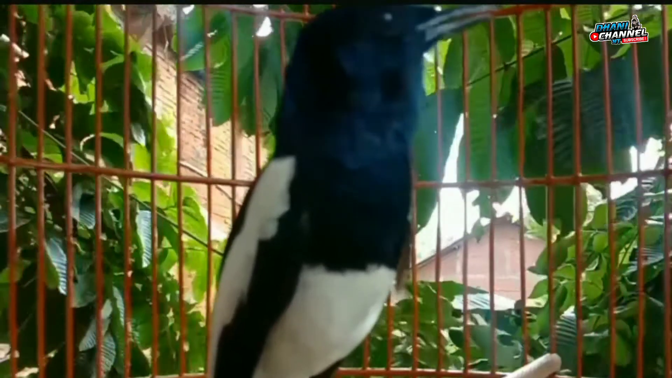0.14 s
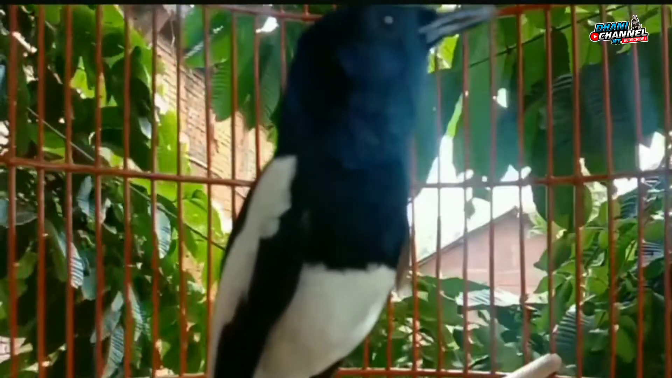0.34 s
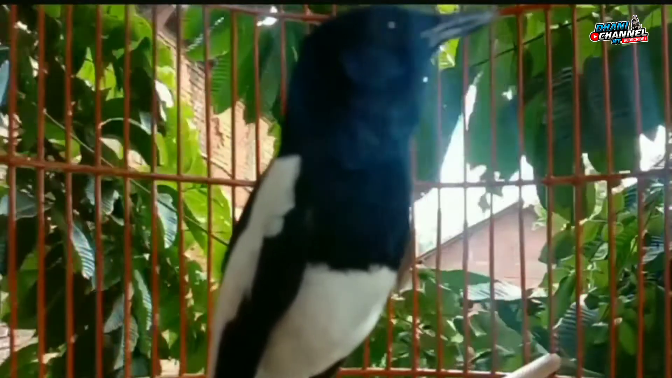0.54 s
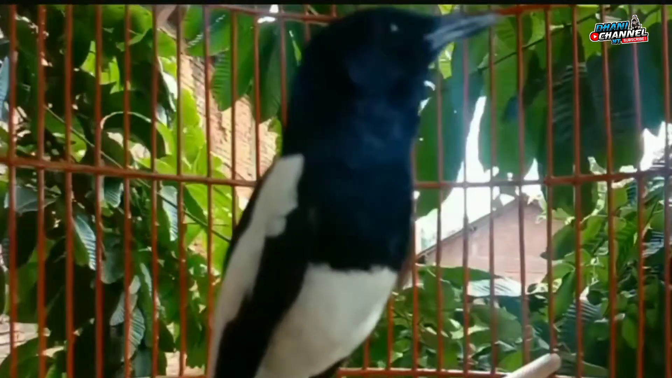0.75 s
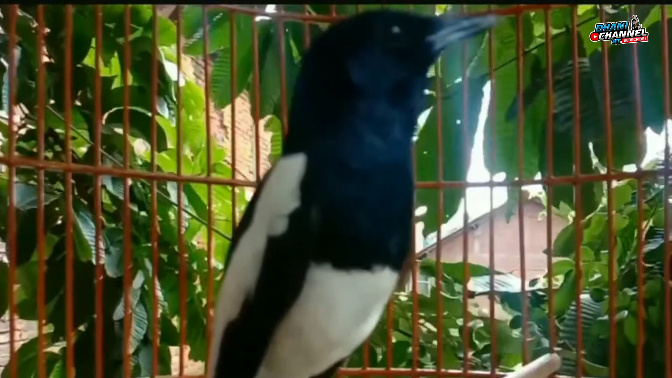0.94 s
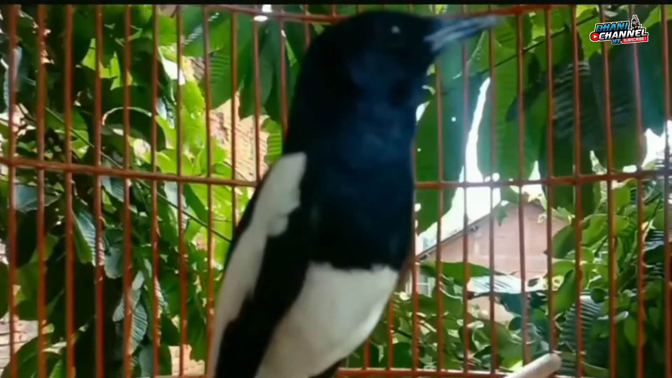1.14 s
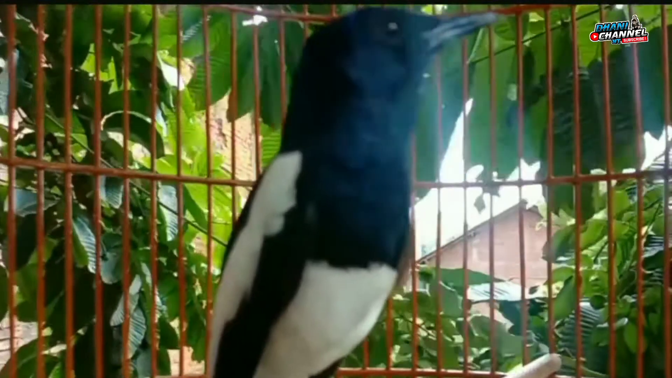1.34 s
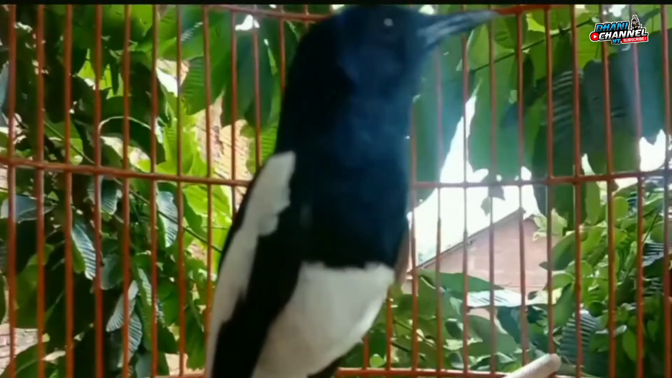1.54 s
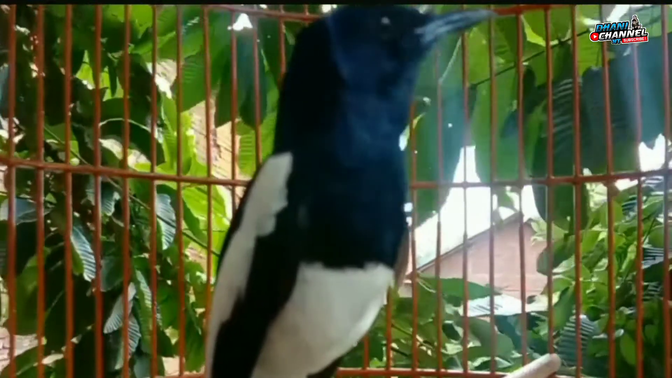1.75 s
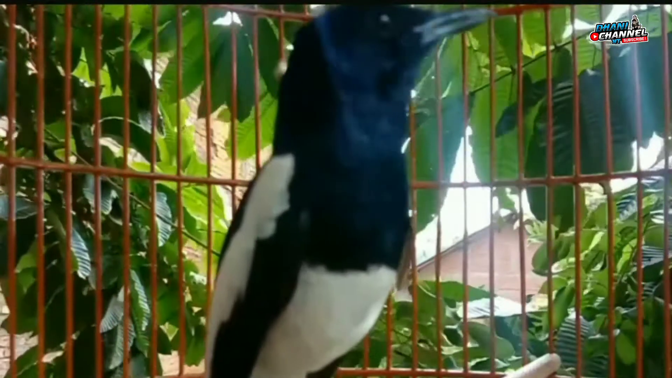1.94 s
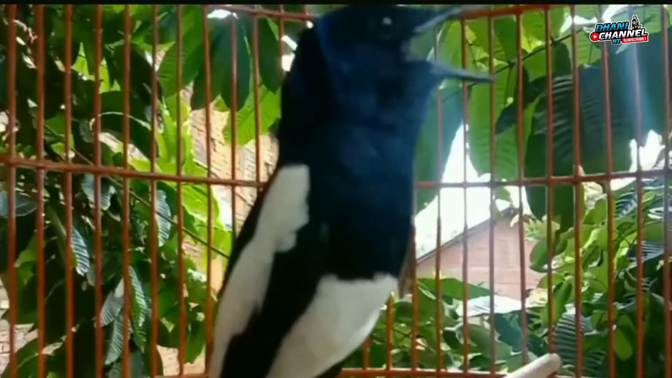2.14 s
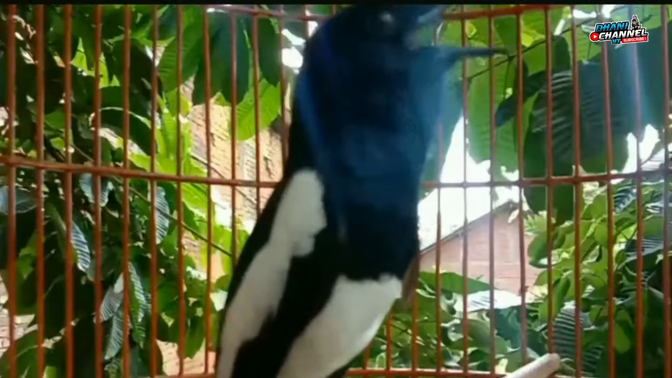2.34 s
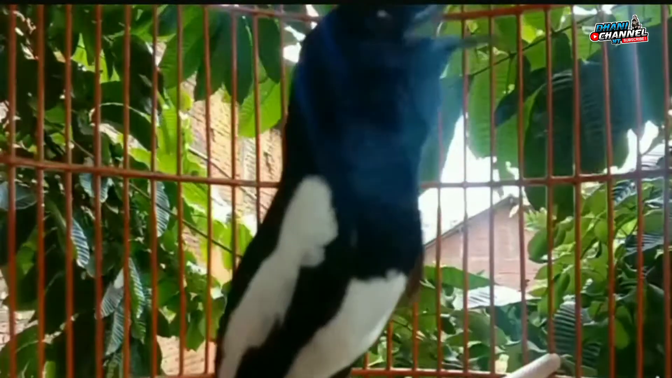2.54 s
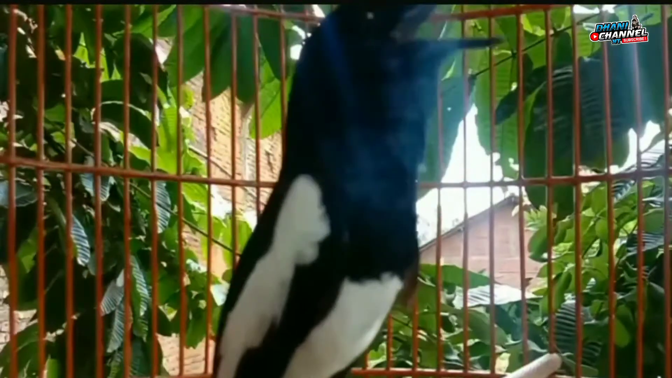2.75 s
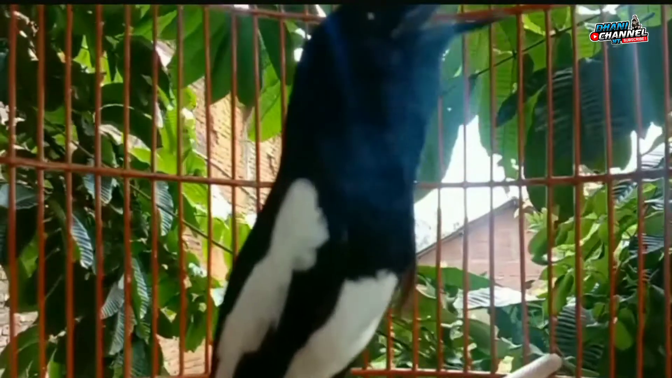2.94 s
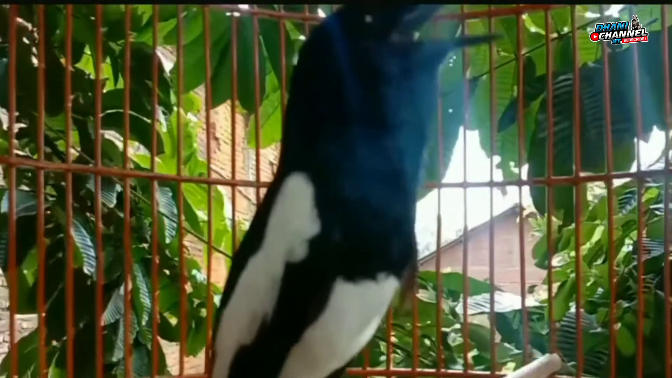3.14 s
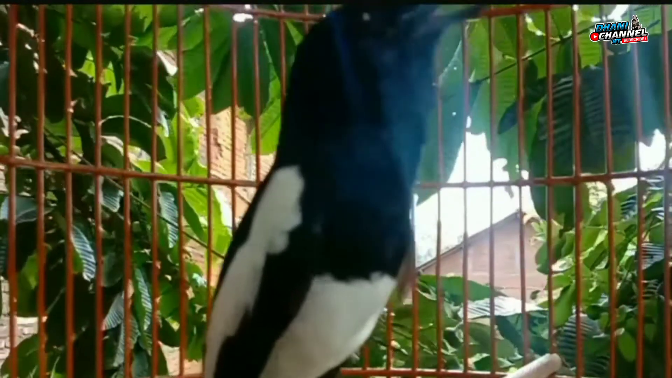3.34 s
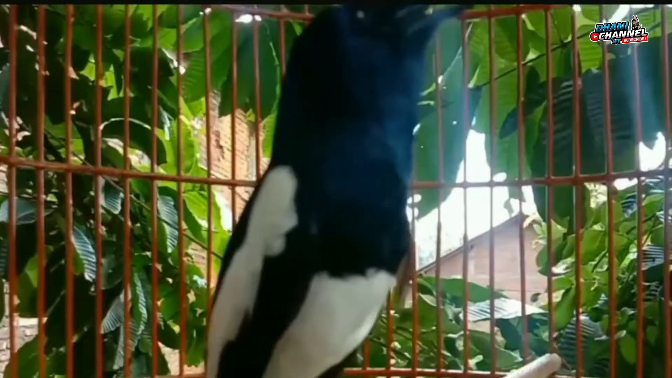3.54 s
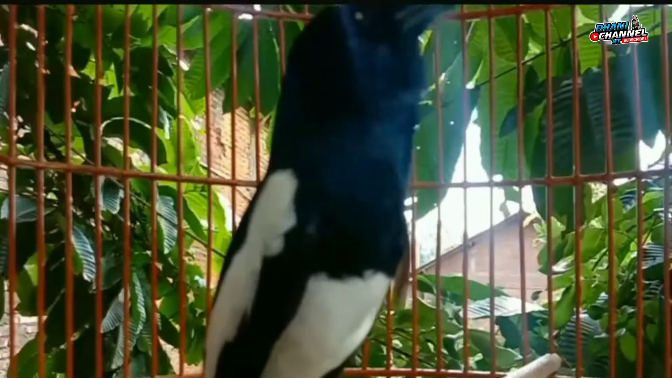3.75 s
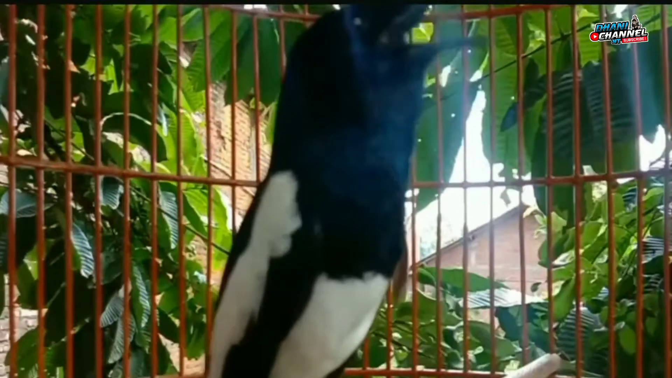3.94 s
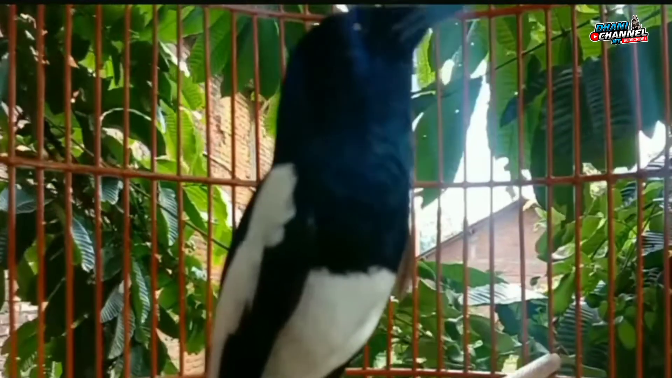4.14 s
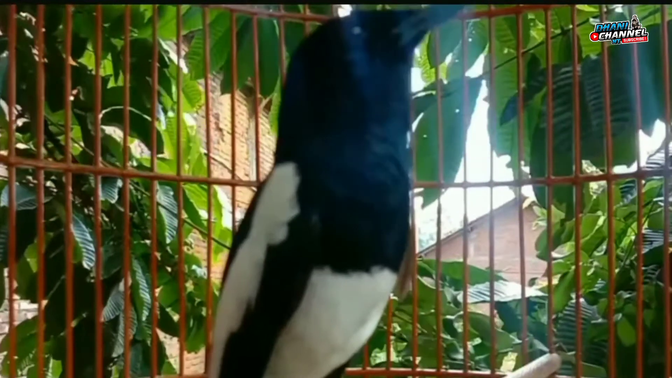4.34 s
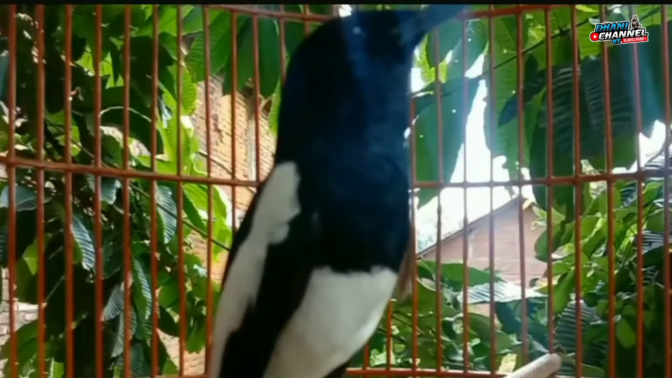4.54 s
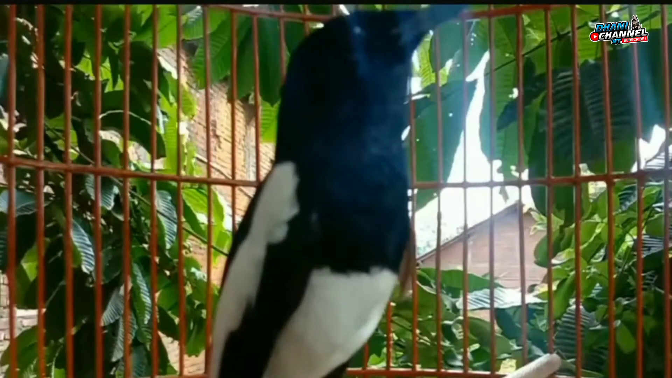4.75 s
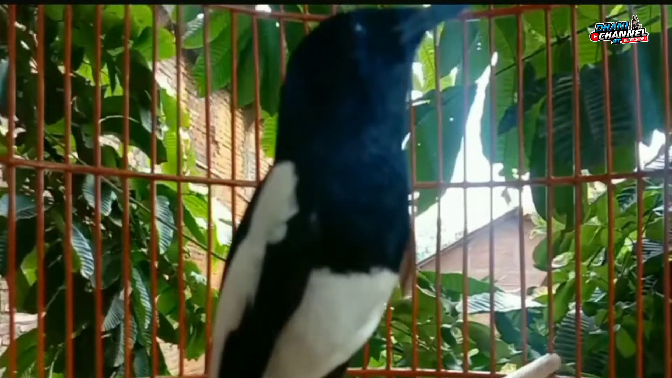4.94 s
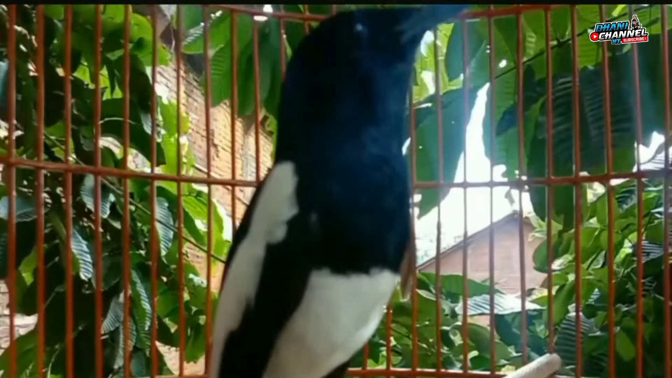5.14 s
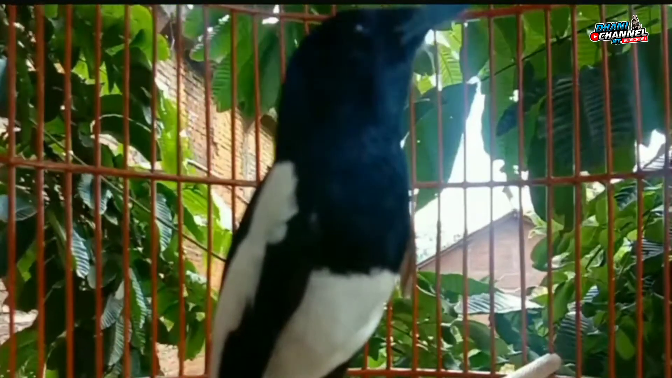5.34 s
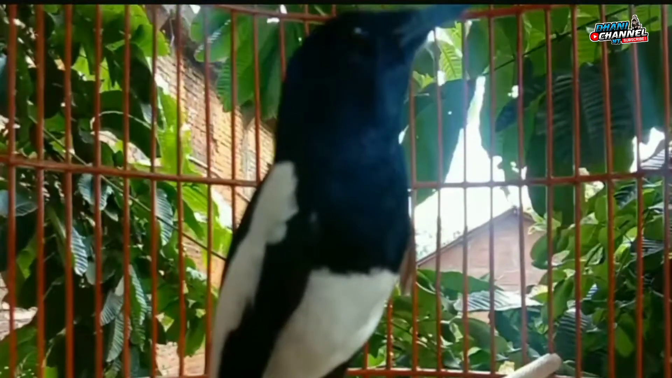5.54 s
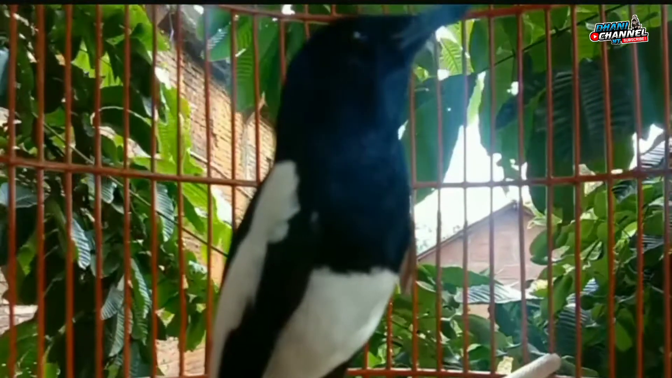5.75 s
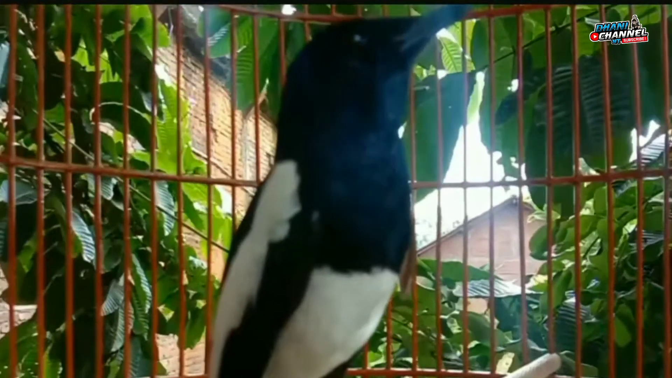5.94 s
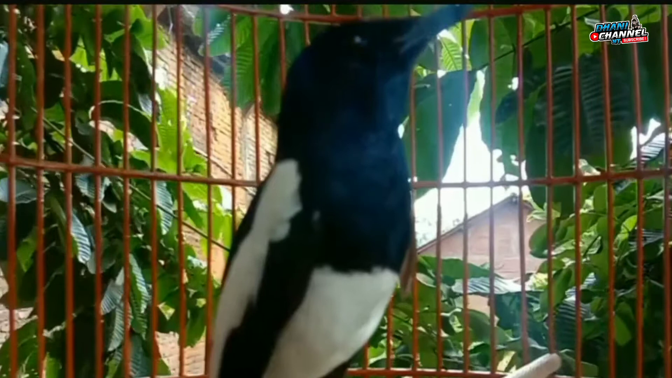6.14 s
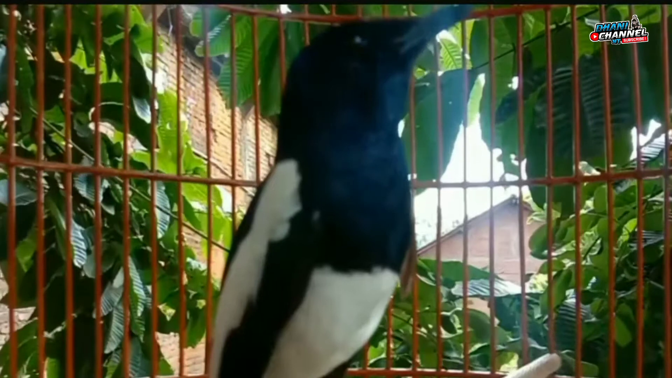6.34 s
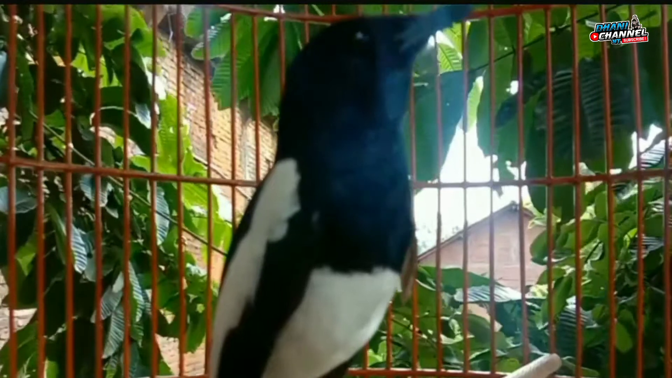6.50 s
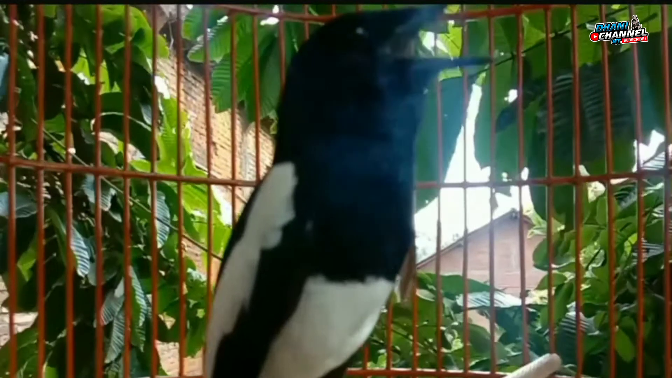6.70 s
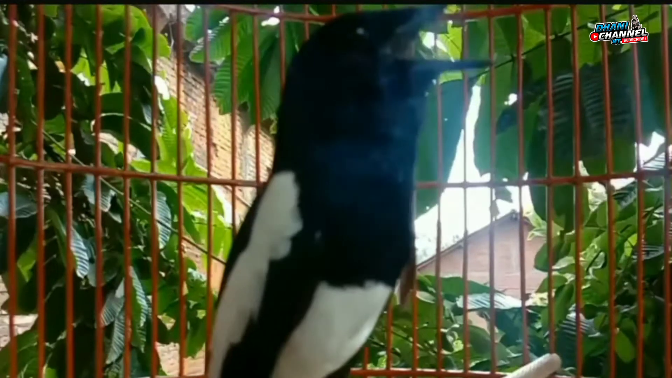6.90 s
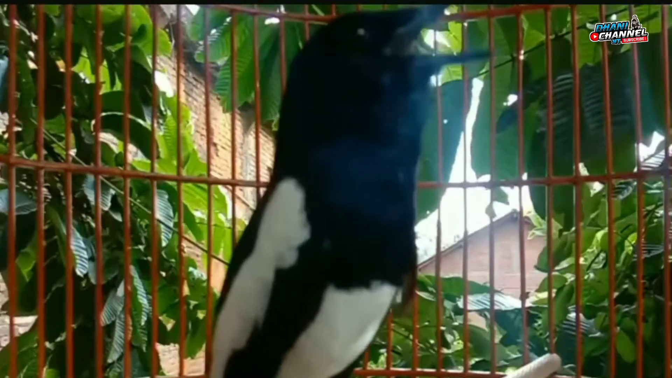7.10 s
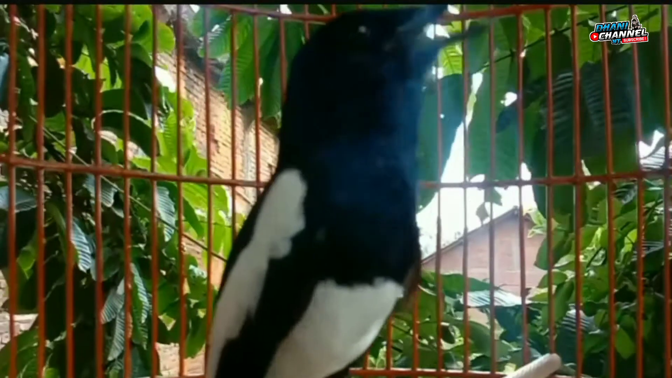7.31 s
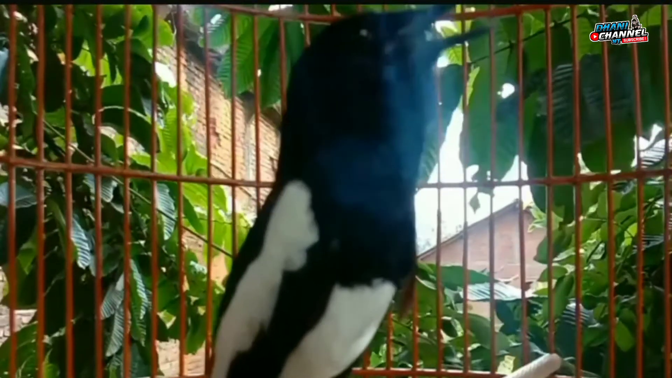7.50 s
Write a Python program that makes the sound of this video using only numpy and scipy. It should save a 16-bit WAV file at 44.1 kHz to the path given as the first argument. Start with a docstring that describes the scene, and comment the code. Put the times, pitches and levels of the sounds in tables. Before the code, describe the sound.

From 0 to 2 seconds a quiet garden is raised by phone gain: muffled traffic, airy street noise, a wavering low hum, thin descending far whistles, and a wheezy, raspy call around 0.9 to 1.3. At 2.0 a caged songbird close by bursts in with a clear high whistle lasting a third of a second, then separate short hooked, falling and level notes until 3.9, several breaking into a fast buzzing trill; the last swoops down, rattles and leaps up. A faint wheeze slips between notes at 2.3. From 4.4 to 5.7 a small bird across the garden sings thin hooked notes, followed by a neighbour's wheezes and rasp to about 6.1. Traffic and hum swell. At 6.65 the near bird returns with a held whistle, a hooked note at 7.0 and a trilled fall into a short rise at 7.25 to 7.55. A last faint wheeze and rasp end it. Short wall echo fills the gaps.

```python
"""A walled garden on a phone microphone: traffic, street and a wavering hum lie under thin far whistles,
wheezes and rasps. At two seconds a caged songbird close by whistles a loud phrase, some notes breaking into
a fast trill. Then a small bird across the garden sings hooked notes and a neighbour wheezes and rasps.
The near bird sings again, and a last wheeze and rasp follow.
The phone lifts its gain in every pause, so garden and echo swell between the notes."""
import sys
import numpy as np
from scipy import signal
from scipy.fft import rfft, irfft, next_fast_len
from scipy.io import wavfile
from scipy.ndimage import uniform_filter1d, minimum_filter1d, map_coordinates

SR = 44100
rng = np.random.default_rng(int(sys.argv[2]) if len(sys.argv) > 2 else 0)


def log_audio(samples):
    """Write samples as a 16-bit WAV file to the path given in sys.argv[1]."""
    # one column per channel
    frames = np.atleast_2d(samples).T
    # limit to full scale, then quantise
    limited = np.clip(frames, -1, 1)
    pcm = np.round(limited * 32767).astype(np.int16)
    wavfile.write(sys.argv[1], SR, pcm)


N = 338247

# Levels in the tables are relative: distance, partials and the phone's gain change them later.
# Overtones of the near bird. Each row: multiple of the pitch, level in dB before the throat.
OVERTONES = [(2, -32.5), (3, -45.5), (4, -37.5), (5, -41.5), (6, -41), (7, -42)]
# Throat that colours those overtones. Each row: frequency in Hz, gain in dB.
THROAT = [(3600, 11), (5000, -5.5), (7300, 1), (8400, -5.5), (9700, 8.5), (11200, -0.5), (12700, -19),
          (15000, -4)]
# Hoarse air of the near bird. Each row: frequency in Hz, relative density in dB per Hz.
BREATH = [(1200, -18), (2000, -1.5), (4000, 2.5), (6000, -9), (7800, -16.5), (9600, -1), (12500, -21),
          (15500, -19.5)]

# Syllables of the near bird, tuned later. Each row: share of the length, pitch in Hz, level in dB.
CREST = [(0, 2417, -23), (.032, 2630, -11.5), (.16, 3150, -0.5), (.23, 3196, 1), (.35, 3217, 0.5),
         (.68, 3108, 2.5), (.87, 3034, -1), (.95, 2914, -1.5), (1, 2816, -14)]
HELD = [(0, 2500, -27.5), (.036, 2800, -18), (.1, 2903, -2), (.14, 3010, -5), (.33, 3123, -1.5),
        (.89, 3090, 3), (.95, 3054, -6), (1, 3000, -7.5)]
HOOK = [(0, 2607, -25), (.1, 2700, -12), (.25, 2824, -0.5), (.44, 2877, 1), (.6, 2744, 3),
        (.85, 2320, -5.5), (.91, 2130, -11.5), (1, 1470, -21.5)]
FALL = [(0, 3693, -35.5), (.08, 3760, -8.5), (.18, 3720, 0), (.37, 3565, 2), (.55, 3082, 0.5),
        (.72, 2900, -1), (.9, 2748, -1), (1, 2530, -6)]
RISE = [(0, 2200, 2), (.06, 2404, -6), (.25, 2424, -2), (.75, 2571, 2), (.93, 2585, -6.5), (1, 2613, -28.5)]
FLAT = [(0, 2400, -36), (.063, 2463, -13.5), (.155, 2469, 1), (.34, 2459, -0.1), (.9, 2541, 1),
        (.96, 2569, -8.5), (1, 2480, -1)]
SWOOP = [(0, 2535, -12.5), (.084, 2465, 4), (.19, 2292, -1), (.39, 1913, -2), (.5, 1864, -0.5),
         (.62, 1920, -1.5), (.73, 2415, -0.2), (.78, 2744, 0.5), (.84, 3091, 0.8), (.94, 3005, -0.5),
         (.965, 2895, -10.5), (1, 2206, -13)]
# Trill or hoarse break of a syllable. Each row: share of the length, beats per second,
# swing in Hz before the note's trill depth, breath under the tone in dB.
HOOK_BREAK = [(.5, 120, 2, -59), (.83, 120, 97, -26), (1, 90, 64, -11)]
FALL_TRILL = [(.28, 97, 4.3, -60), (.43, 97.6, 85, -55.5), (.9, 89.3, 42, -45.5), (1, 70.87, 42, -21.5)]
SWOOP_TRILL = [(.02, 68.2, 2, -42), (.25, 65.6, 8, -27.5), (.34, 66.2, 70, -22.5), (.62, 68, 66, -25),
               (.7, 83, 261, -21), (.83, 95.8, 263, -40.5), (1.002, 122.3, 270, -30)]
# The near song. Each row: syllable, its trill, start in seconds, length in seconds, highest pitch in Hz
# before the sag, sag over the note in Hz, level in dB, swell over the note in dB, overtones in dB,
# trill depth as a factor.
SUNG = [(CREST, [], 2.0, .314, 3208, 0, -26.5, 0, -1.02, 0),
        (HOOK, HOOK_BREAK, 2.392, 0.13, 2845, 10, -27, .3, 2.1, 1),
        (FALL, FALL_TRILL, 2.586, .175, 3782, 52, -25.5, .3, 4.6, .6), (RISE, [],
        2.757, .149, 2590, 5, -27, -0.32, -2.5, 0),
        (HOOK, HOOK_BREAK, 3.022, 0.11, 2835, 110, -27.5, .3, .4, 1), (FLAT, [],
        3.26, 0.2044, 2576, 0, -27, 0, -1, 0), (SWOOP, SWOOP_TRILL, 3.552, .381, 3082, 0, -30, 0, 2, 1),
        (HELD, [], 6.645, .274, 3127, 0, -25.5, 0, -3.5, 0),
        (HOOK, HOOK_BREAK, 7.0, 0.13, 2845, 5.6, -26.5, -.3, 3.3, 1.05),
        (FALL, FALL_TRILL, 7.236, .166, 3743, -90.5, -26.5, -.3, 7.1, 1.7), (RISE, [],
        7.397, .151, 2600, 12, -27.5, .3, -3, 0)]

# Hooked notes of a small bird. Each row: share of the length, nominal pitch in Hz, level in dB.
DROP = [(0, 3260, 5), (.4, 3100, -8), (1, 2420, 6)]
DIP = [(0, 2950, -7), (.15, 2994, 1), (.52, 2890, -2), (.8, 3000, -3), (1, 3400, -2)]
JUMP = [(0, 2493, 2), (.17, 2500, -1), (.28, 2950, 1), (1, 2710, -2.5)]
# Its song. Each row: shape, start in seconds, length in seconds, sag over the note in Hz, level in dB.
HOOKS = [(DROP, 4.365, 0.057, -100, -59), (DIP, 4.445, .235, 5.6, -62.5), (JUMP, 4.765, 0.11, 5, -59),
         (DROP, 4.972, 0.045, 120, -59), (DIP, 5.055, .2, 4.2, -59.5), (JUMP, 5.39, 0.121, 5, -61),
         (DROP, 5.625, 0.019, 60, -62), (JUMP, 5.64, 0.099, 290, -58.5)]
# Far whistles and chirps. Each row: start in seconds, length in seconds, first pitch in Hz,
# last pitch in Hz, peak in dB, place of the peak as a share of the length.
WHISTLES = [(.06, 0.102, 4020, 3670, -55.5, 0.43), (.145, 0.13, 3047, 2754, -47, 0.12),
            (.2, .06, 2590, 2480, -50, .4), (.51, 0.2, 2930, 2750, -43.5, 0.43),
            (.67, 0.15, 3454, 3260, -58.5, 0.12), (.6, 0.14, 1093, 1050, -57.5, 0.55),
            (1.15, 0.088, 718, 539, -54.5, 0.33), (1.27, .08, 850, 790, -56.5, .15),
            (1.55, 0.066, 1997, 2030, -58.5, 0.18), (1.65, .095, 2150, 3400, -65, .7),
            (1.74, 0.057, 3520, 3540, -61.5, 0.28), (1.72, .15, 2970, 3100, -62, .15),
            (1.9, .1, 2915, 2980, -57, 0.73), (3.14, .12, 1040, 895, -55.5, 0.23),
            (4.02, 0.22, 2793, 2826, -60, 0.48), (4.41, 0.046, 2530, 2500, -60, .25),
            (4.95, 0.27, 1130, 1180, -59, 0.77), (5.2, 0.33, 4000, 3456, -60, .4),
            (5.23, .08, 7050, 5990, -58.5, 0.4), (5.42, 0.11, 7590, 6640, -55.5, .55),
            (7.25, 0.084, 2723, 2420, -34.5, .15)]
# A neighbour's wheezy notes. Each row: start in seconds, length in seconds, strongest partial at first
# in Hz, at last in Hz, peak in dB, place of the peak as a share of the length.
WHEEZES = [(.9, 0.086, 4470, 4366, -50.5, 0.78), (.92, 0.073, 4110, 3250, -51.5, 0.71),
           (.98, .1, 3300, 2800, -50, 0.34), (1.08, 0.084, 4050, 3880, -57.5, 0.8),
           (1.08, 0.085, 2764, 2737, -60, .45), (1.13, 0.068, 4650, 5000, -55, .25),
           (2.3, .1, 4520, 4070, -52, 0.76), (5.71, .1, 4510, 4697, -50, 0.84),
           (5.79, 0.056, 6450, 6480, -54.5, .25), (5.83, 0.068, 3830, 3580, -58, 0.21),
           (5.87, 0.079, 4700, 4390, -49, 0.12), (5.9, 0.063, 3030, 3220, -66, .6),
           (5.965, 0.094, 5794, 5930, -62.5, .3), (7.62, .045, 5020, 4445, -48.5, .8)]
# Partials of a wheeze. Each row: multiple of the strongest partial, level in dB.
WHEEZE_PARTIALS = [(.5, -6.5), (1, 7.5), (1.5, -8.5), (2, -7.5), (2.5, -20)]
# Breathy rasp of those calls. Each row: start in seconds, length in seconds, peak in dB,
# shares of the length where the hold starts and where it ends.
RASPS = [(.885, .4, -50, 0.22, 0.54), (2.279, 0.16, -42.5, 0.1467, .9), (3.49, 0.087, -51, 0.48, .85),
         (5.78, .31, -53, 0.054, .6), (6.28, 0.27, -59.5, 0.43, 0.5), (7.532, 0.17, -49, .1, .9)]
# Colour of the rasp. Each row: frequency in Hz, relative density in dB per Hz.
RASP_COLOUR = [(880, -35), (1500, -46.5), (1790, -22.5), (2840, 3.5), (4540, -0.5), (5310, -9),
               (6040, -9.5), (8100, -20.5), (8850, -19), (12100, -23.5), (15600, -45.5)]

# Decay of the garden walls. Each row: frequency in Hz, time to fall by 60 dB in seconds.
WALLS = [(1000, 0.12), (3000, 0.27), (8000, 0.25), (15000, 0.17)]
# Background levels. Each row: time in seconds, traffic in dB, street in dB, garden in dB.
AIR = [(0, -55, -53, -60.5), (0.6, -58, -59, -61), (0.85, -58.5, -62.5, -76.5), (1.2, -66, -60.5, -67),
       (1.5, -65, -58.5, -56.5), (1.75, -68, -68.5, -74.5), (2, -62.5, -70.5, -62),
       (3.1, -69.5, -70.5, -70), (4.0, -59.5, -73.5, -61), (4.4, -62.5, -63, -70.5),
       (4.85, -60.5, -60.5, -68.5), (5.2, -60.5, -61.5, -63.5), (5.45, -57, -72, -65.5),
       (5.7, -61, -64, -75.5), (6.2, -54.5, -60, -64), (6.6, -55, -61, -68.5), (7, -53, -59, -68),
       (7.6, -56, -66.5, -60)]
# The low hum. Each row: time in seconds, pitch in Hz, level in dB.
HUM = [(0, 113.6, -58.5), (0.25, 113.7, -51), (0.9, 111.8, -59), (1.25, 106.7, -60.5), (1.6, 99, -72.5),
       (2.5, 93.8, -68.5), (4.6, 93.5, -70), (4.85, 92.5, -61.5), (5.35, 92.8, -54.5), (5.7, 92.3, -65),
       (6.3, 93.7, -52.5), (6.5, 93.4, -71), (7.2, 115, -60.5), (7.6, 110.4, -55)]
# Colours of the three background beds. Each row: frequency in Hz, relative density in dB per Hz.
TRAFFIC = [(15, -67.5), (25, -50.5), (59, -20), (102, 0), (220, -4), (258, -15), (330, -8.5), (482, -14.5),
           (800, -37.5), (1040, -61), (1760, -120)]
STREET = [(350, -25.5), (600, -2), (945, -9), (1110, -5), (1270, 5), (1460, -7.5), (1830, -6), (2310, -8),
          (2600, -10.5), (3380, -36.5), (5720, -120)]
GARDEN = [(1060, -39.5), (1800, -21.5), (2660, -15), (2880, -1.5), (3610, -2.5), (3920, -2.5),
          (4250, -12.5), (4740, -3.5), (5890, -13.5), (6330, -29.5), (6990, -14.5), (8300, -25),
          (10300, -26), (15600, -46)]
# The phone's own noise. Each row: frequency in Hz, relative density in dB per Hz.
HISS = [(20, 10.5), (1000, -9), (8000, -5), (12000, -6.5), (15700, -7)]

TOP_HZ = 15700  # upper edge of the phone's band
RISING_DB, FALLING_DB = 7, -2  # overtones gain this in a fast glide up, down
GLIDE_HZ_PER_S = 5300  # the glide that brings most of it
WHISTLE_SWELL, WHEEZE_SWELL = (8.5, 9.3), (4.4, 10.4)  # dB below the peak at the start, at the end
RASP_IN_DB, RASP_OUT_DB = 12.5, 21.5  # below the peak at the start, at the end


def songbird():
    """A nearly pure whistle; in a trill the pitch leaps up and slides down, the tone breaks at the bottom, air leaks."""
    swing, breaks_db, hoarse = np.zeros((3, N))
    uneven, depth, rattle = wobble(45), amp(2.5 + 5.6 * wobble(50)), wobble(260)
    song, trills = sung()
    for rows in trills:
        at, edge, (rate, swing_hz, hoarse_db) = span(rows)
        beat = 2 * np.pi * np.cumsum(rate) / SR + .5 * uneven[at]
        swing[at] = edge * swing_hz * (np.sin(beat) + 0.16 * np.sin(2 * beat) + .3 * rattle[at])
        strain = edge * np.tanh(swing_hz / 120)  # wider swings unsettle the tone, up to a limit
        room = np.clip((100 - rate) / 28, .12, 1)  # slow beats leave time for a gap
        gap = room * ((1 - np.sin(beat + 0.32)) / 2) ** 6
        breaks_db[at] = strain * (2.0 * rattle[at] - 9 * depth[at] * gap)
        hoarse[at] = edge * amp(hoarse_db)
    bend_hz = swing + 5 * wobble(60)
    shake_db = breaks_db + 0.38 * wobble(45)
    tone = notes(song, [(1, 0.0013)] + OVERTONES, bend_hz, shake_db, THROAT)
    effort = np.abs(signal.hilbert(tone, next_fast_len(N))[:N])  # the breath follows the tone's envelope
    return tone + hoarse * effort * rush(BREATH, patchy_db=6, bins=8, frames=4)


def sung():
    """Every syllable stretched, tuned and sagging as its row says; overtones follow the glide of the pitch."""
    song, trills = [], []
    for shape, trill, start, length, top_hz, sag_hz, db, swell_db, overtones_db, depth in SUNG:
        share, hz, level = np.transpose(shape)
        s = start + share * length
        hz = hz * top_hz / hz.max() - sag_hz * share
        glide = np.tanh(np.gradient(hz, s) / GLIDE_HZ_PER_S)
        bright_db = overtones_db + np.where(glide > 0, RISING_DB, -FALLING_DB) * glide
        song.append(np.transpose([s, hz, db + level + swell_db * share, bright_db]))
        if trill:
            trills.append([(start + at * length, rate, depth * swing_hz, air_db)
                           for at, rate, swing_hz, air_db in trill])
    return song, trills


def far_birds():
    """All the farther calls, their direct sound blurred by the echo of the walls."""
    hooks, whistles, wheezes, rasps = hooked_song(), far_whistles(), neighbour_wheezes(), neighbour_rasps()
    direct = hooks + amp(-8.0) * (whistles + wheezes) + rasps
    echo = walls(0.62 * hooks + whistles + wheezes + rasps)
    return direct + amp(-8) * echo


def hooked_song():
    """A small bird heard straight across the garden: single sine partials bent along hooked shapes."""
    song = [[(start + at * length, hz - sag_hz * at, db + level) for at, hz, level in shape]
            for shape, start, length, sag_hz, db in HOOKS]
    return notes(song, [(0.98, 0)], 12 * wobble(70), 3.0 * wobble(40))  # 2 % under the nominal pitch


def far_whistles():
    """Thin, unsteady whistles and chirps: a sine with a faint octave."""
    return notes(glides(WHISTLES, WHISTLE_SWELL), [(1, 3.0), (2, -28.5)], 38 * wobble(100), 5 * wobble(80))


def neighbour_wheezes():
    """Notes rich in partials, roughened by fast random shakes of pitch and level."""
    return notes(glides(WHEEZES, WHEEZE_SWELL), WHEEZE_PARTIALS, 45 * wobble(250), 5 * wobble(150))


def neighbour_rasps():
    """Breathy calls: streaky coloured noise that rises, holds and fades."""
    level = np.zeros(N)
    for s, length, peak_db, rise, hold in RASPS:
        end = min(s + length, N / SR)
        at, edge, (db,) = span([(s, peak_db - RASP_IN_DB), (s + rise * length, peak_db),
                                (s + hold * length, peak_db), (end, peak_db - RASP_OUT_DB)])
        level[at] = edge * amp(db)
    return level * amp(3.5 + 0.88 * wobble(130)) * rush(RASP_COLOUR, patchy_db=7.0, bins=3, frames=6)


def walls(x):
    """The garden's answer: a short delay, then a noise tail whose frequencies each die at their own speed."""
    hz, t, z = signal.stft(rng.standard_normal(SR * 3 // 4), SR, nperseg=256)
    decay = amp(-60 * t / along(WALLS, hz)[:, None])
    tail = signal.istft(z * decay, SR, nperseg=256)[1]
    return signal.fftconvolve(np.pad(x, (300, 0)), tail / np.linalg.norm(tail))[:N]


def background():
    """Traffic rumble, street noise, and a garden of far calls smeared into thin streaks; the hum wavers."""
    traffic_db, street_db, garden_db = curves(AIR)
    traffic = amp(traffic_db + 1.3 * wobble(9.6)) * rush(TRAFFIC, patchy_db=5.0, bins=2, frames=8)
    street = amp(street_db + 1.2 * wobble(6)) * rush(STREET, patchy_db=4, bins=2, frames=26)
    garden = amp(garden_db + 1.2 * wobble(5)) * rush(GARDEN, patchy_db=6, bins=2, frames=30)
    return low_hum() + traffic + street + garden


def low_hum():
    """A low tone and its octave, wandering in pitch and level."""
    hum_hz, hum_db = curves(HUM)
    phase = 2 * np.pi * np.cumsum(hum_hz + 4 * wobble(25)) / SR
    return amp(hum_db + 3.6 * wobble(17)) * (np.sin(phase) + 0.28 * np.sin(2 * phase))


def notes(tables, partials, bend_hz, shake_db, colour=((1, 0),)):
    """Sine notes with partials; bend_hz adds to the pitch, shake_db to the level, a last column to the overtones."""
    out = np.zeros(N)
    for rows in tables:
        at, edge, (hz, db, *bright_db) = span(rows)
        hz = uniform_filter1d(hz, round(0.0066 * SR), mode="nearest")  # pitch muscles round every corner
        hz = hz + bend_hz[at]
        phase = 2 * np.pi * np.cumsum(hz) / SR
        tone = 0
        for k, partial_db in partials:
            overtone_db = (along(colour, k * hz) + sum(bright_db)) * (k > 1)
            in_band = k * hz < TOP_HZ
            tone = tone + amp(partial_db + overtone_db) * in_band * np.sin(k * phase)
        out[at] += np.sqrt(2) * edge * amp(db + shake_db[at]) * tone
    return out


def glides(rows, swell):
    """Each note slides from its first pitch to its last, swelling to one peak."""
    in_db, out_db = swell
    return [[(s, a, db - in_db), (s + peak * length, a + peak * (b - a), db), (s + length, b, db - out_db)]
            for s, length, a, b, db, peak in rows]


def rush(spectrum, patchy_db, bins, frames):
    """Coloured noise of rms 1 with patches of random gain, smoothed over bins and frames."""
    hz, _, z = signal.stft(rng.standard_normal(N), SR, nperseg=1024)
    field = uniform_filter1d(rng.standard_normal(z.shape), bins, axis=0)
    field = uniform_filter1d(field, frames, axis=1)
    z = z * amp(patchy_db * unit(field) + along(spectrum, hz)[:, None])
    return unit(signal.istft(z, SR, nperseg=1024)[1][:N])


def wobble(rate):
    """A smooth random curve, rate knots a second."""
    knots = rng.standard_normal(int(N * rate / SR) + 4)
    return map_coordinates(knots, [np.arange(N) * rate / SR])


def span(rows):
    """The samples that a table covers, and its columns on them, with soft ends."""
    s, *cols = np.transpose(rows)
    at = np.arange(round(s[0] * SR), min(round(s[-1] * SR), N))
    edge = np.clip(np.minimum(at - at[0], at[-1] - at) / (0.0076 * SR), 0, 1)
    return at, edge, [np.interp(at / SR, s, c) for c in cols]


def curves(rows):
    """One value per sample for each column after the time."""
    s, *cols = np.transpose(rows)
    return [np.interp(np.arange(N) / SR, s, c) for c in cols]


def along(points, hz):
    """(Hz, value) points on a log axis."""
    f, v = np.transpose(points)
    return np.interp(np.log(hz + 1), np.log(f + 1), v)


def unit(x):
    """Scaled to rms 1."""
    return x / np.sqrt(np.mean(x ** 2) + 1e-20)


def amp(db):
    """Decibels to gain."""
    return 10 ** (np.asarray(db) / 20)


def scene():
    """The near bird, its echo, and all else far behind it."""
    bird = songbird()
    echo = amp(-23.5) * walls(bird)
    distance = amp(-18.5) * (far_birds() + background())
    return (bird + echo + distance)[None]


def record(dry):
    """Gain control lifts quiet moments, ducks just ahead of a loud note and lets go fast; then hiss and band limit."""
    power = np.abs(uniform_filter1d(dry[0] ** 2, round(0.0022 * SR)))
    level_db = 10 * np.log10(power + 1e-12)
    lift_db = np.clip(-.95 * (level_db + 42), 0, 19.9)  # lifts whatever lies under -42 dB
    lift_db = minimum_filter1d(lift_db, round(0.0025 * SR))
    lift_db = uniform_filter1d(lift_db, round(0.046 * SR))  # centred, so it also looks ahead
    x = dry * amp(lift_db) + amp(-75.5) * rush(HISS, patchy_db=1.5, bins=20, frames=6)
    m = next_fast_len(N)
    in_band = np.fft.rfftfreq(m, 1 / SR) < TOP_HZ
    return irfft(rfft(x, m) * in_band, m)[:, :N]


dry = scene()
out = record(dry)
log_audio(out)
```